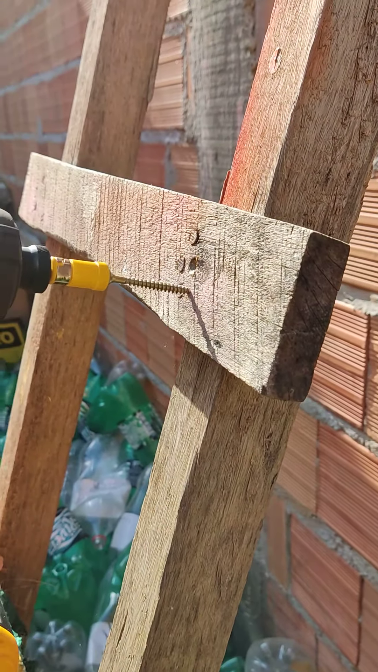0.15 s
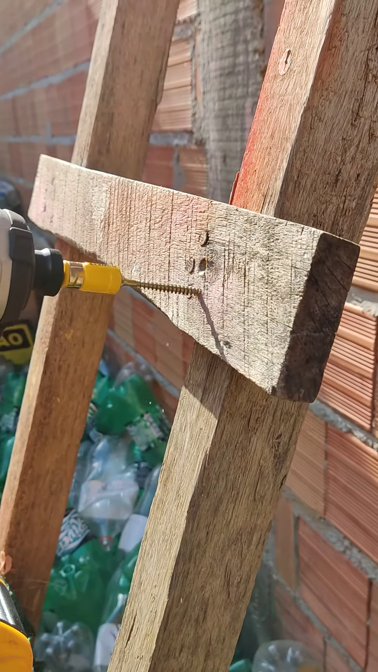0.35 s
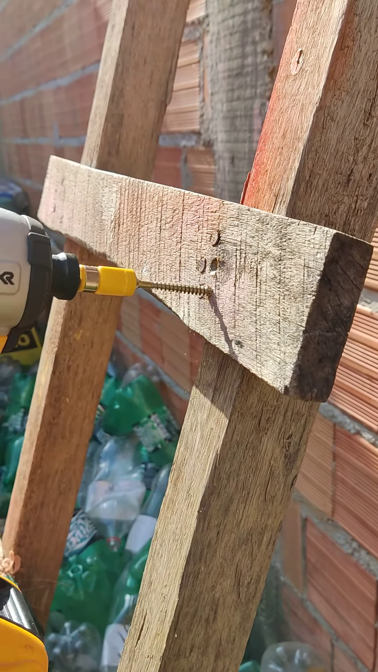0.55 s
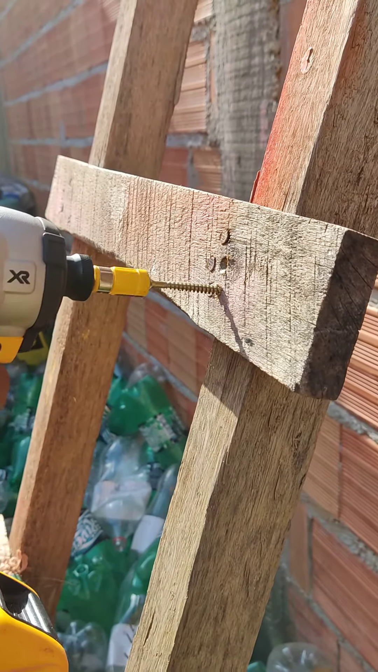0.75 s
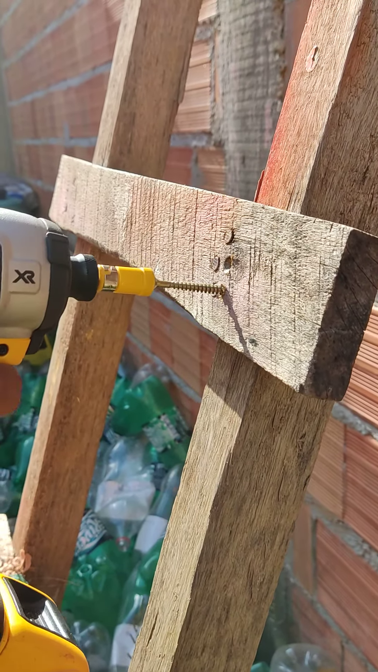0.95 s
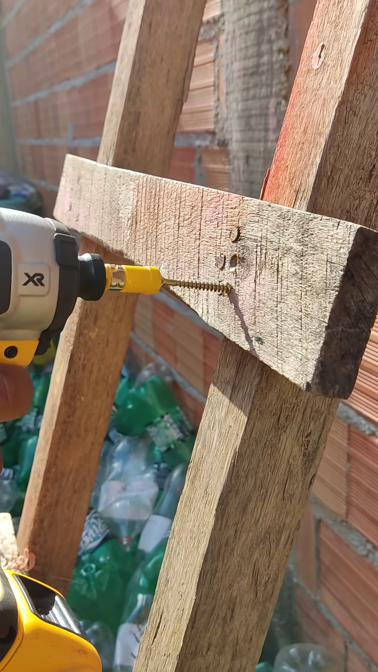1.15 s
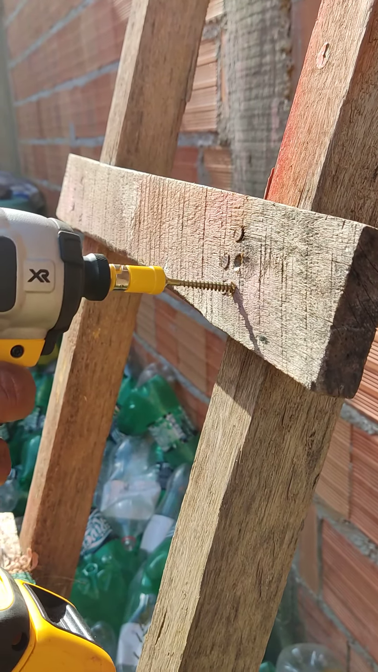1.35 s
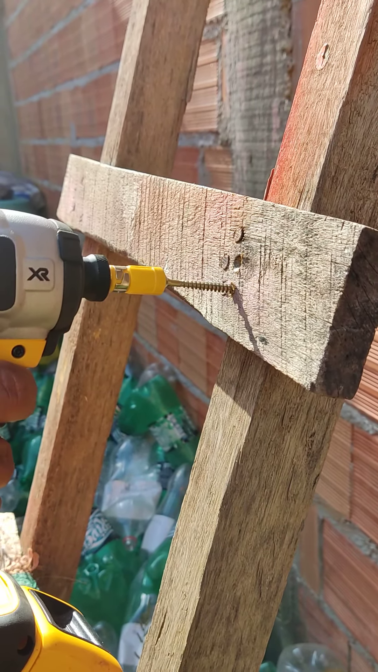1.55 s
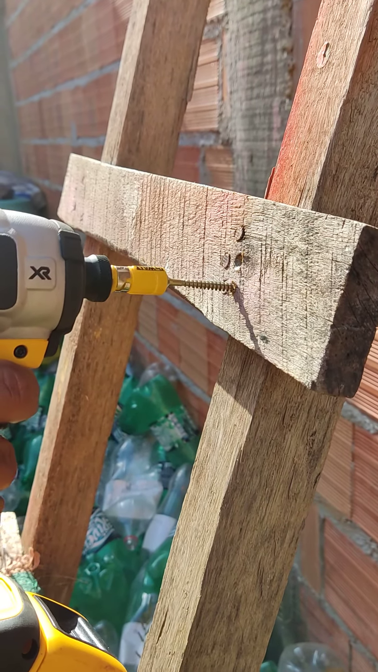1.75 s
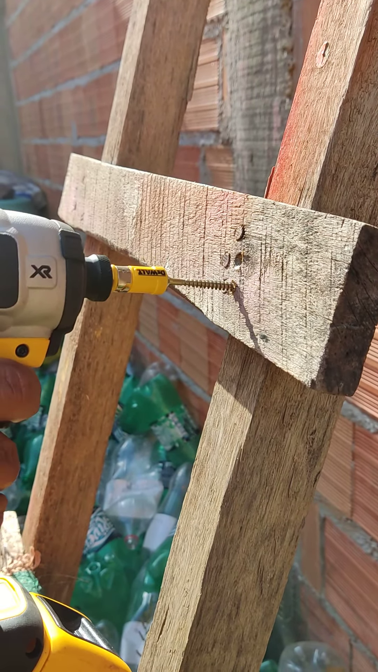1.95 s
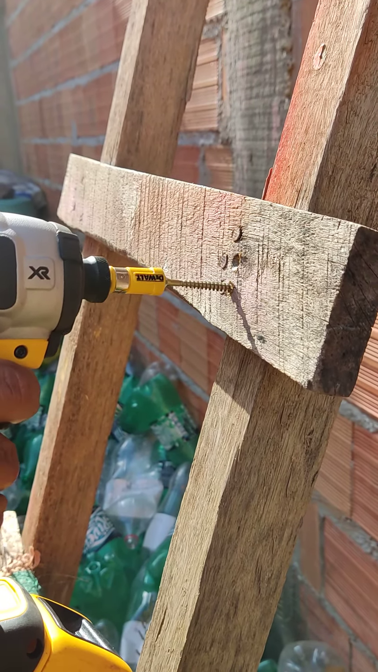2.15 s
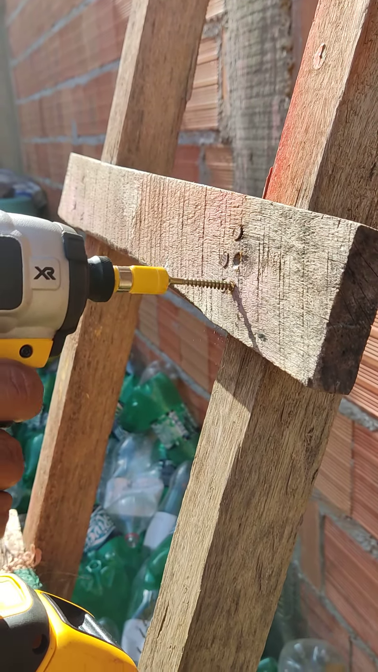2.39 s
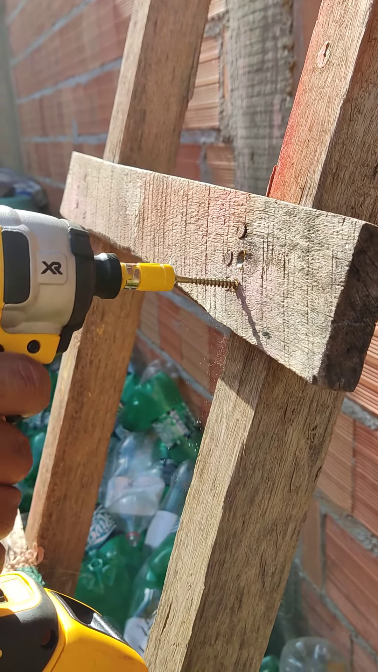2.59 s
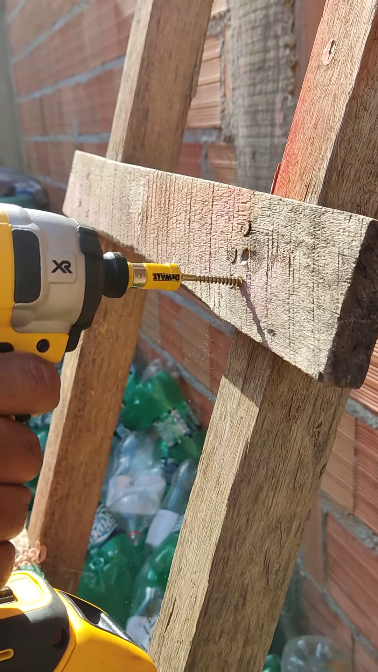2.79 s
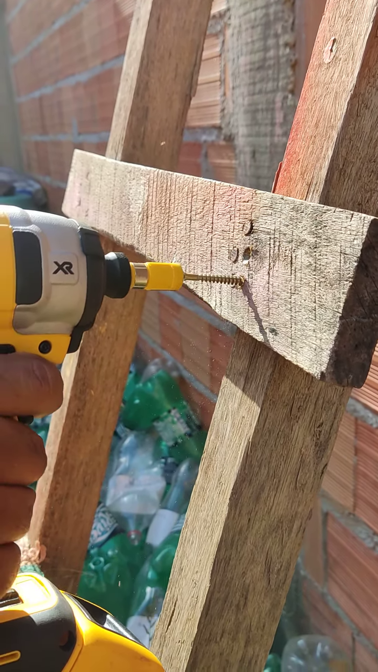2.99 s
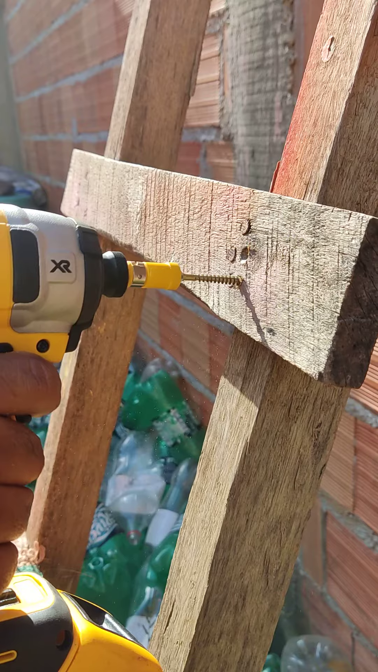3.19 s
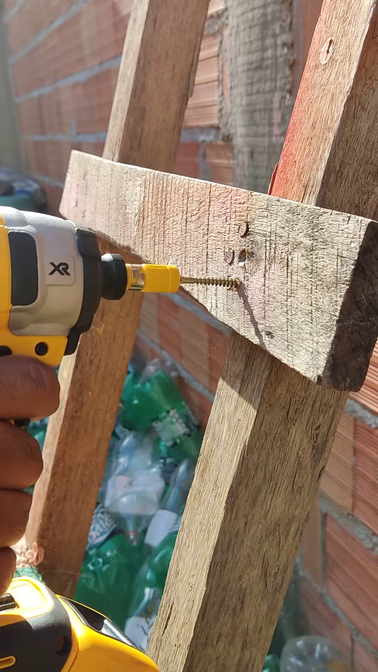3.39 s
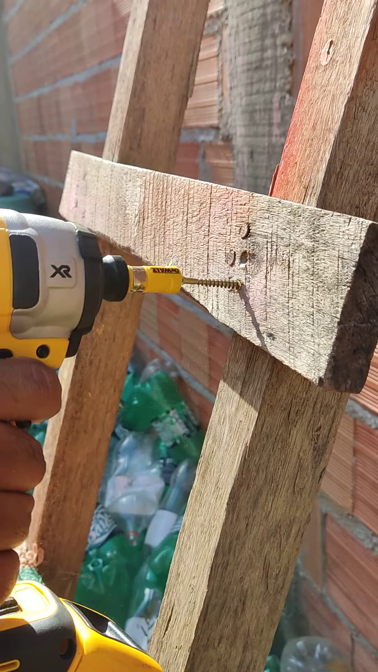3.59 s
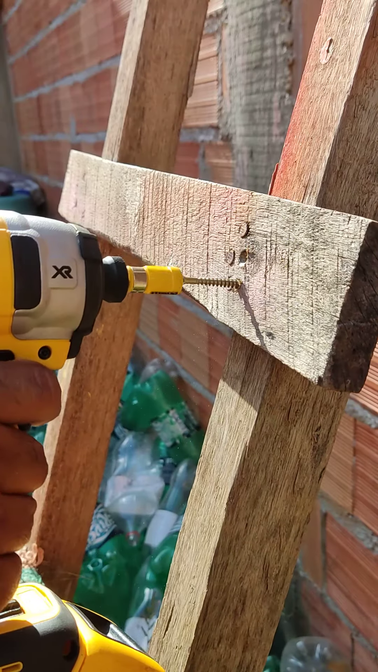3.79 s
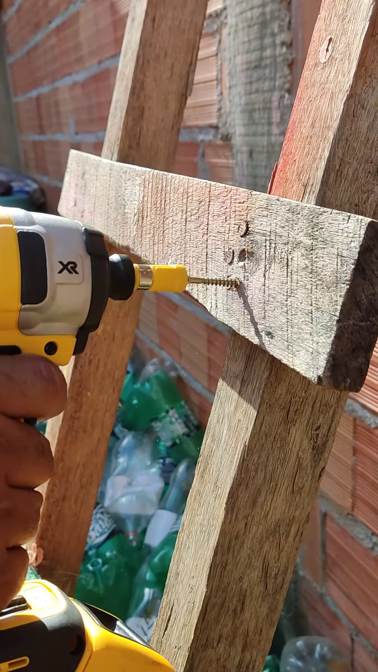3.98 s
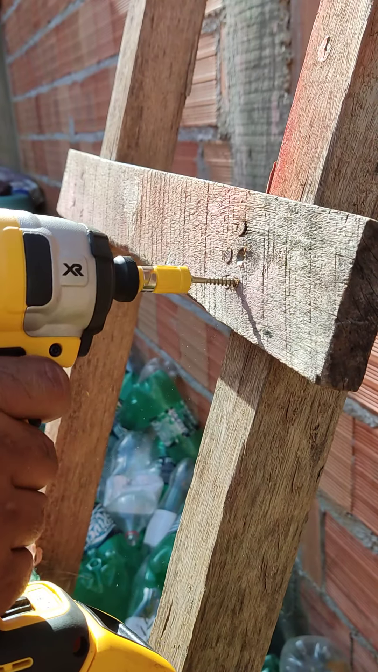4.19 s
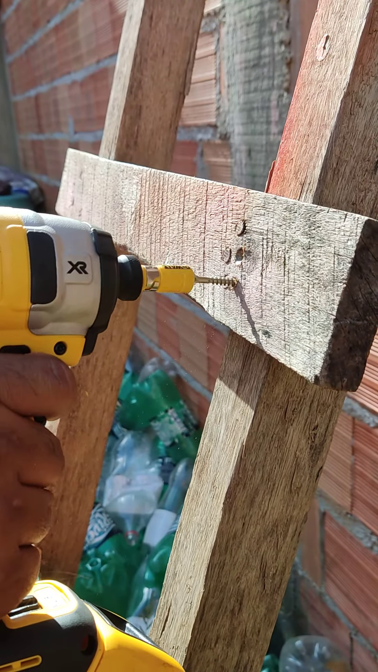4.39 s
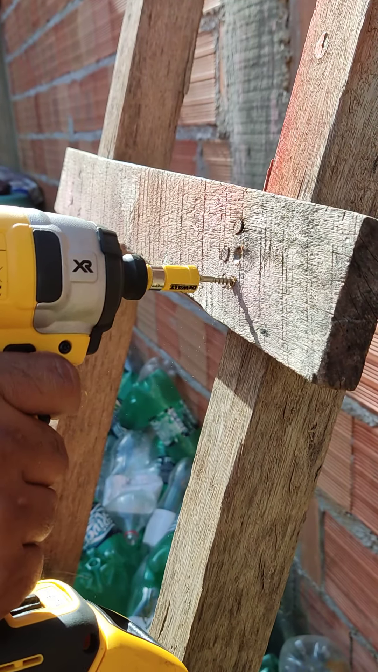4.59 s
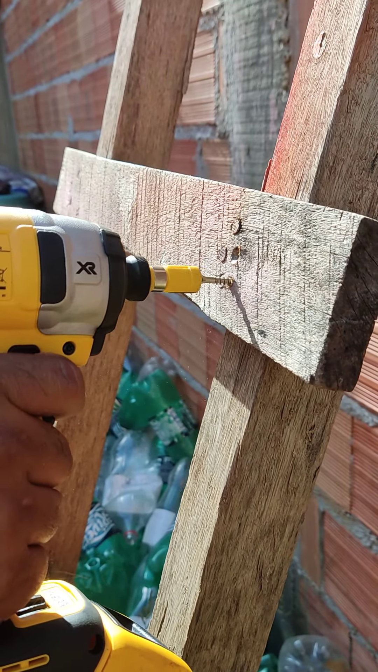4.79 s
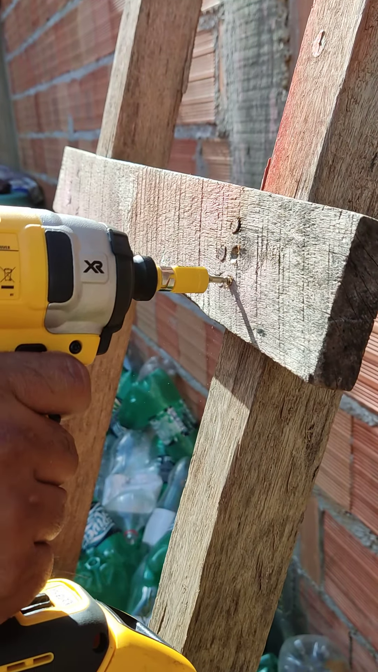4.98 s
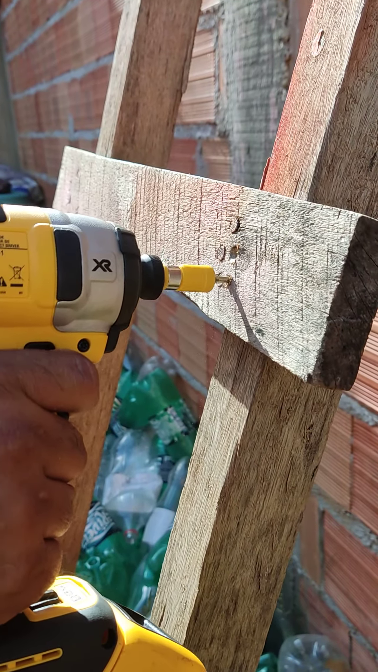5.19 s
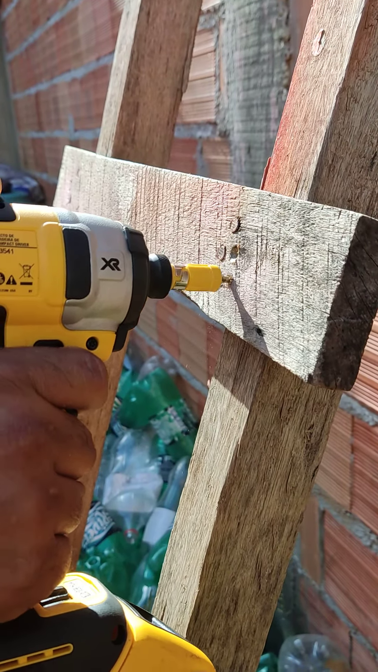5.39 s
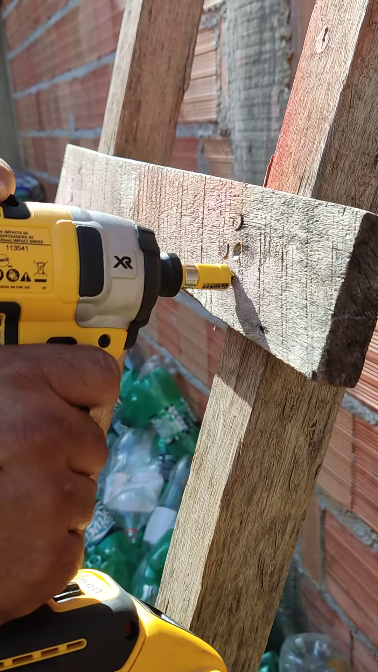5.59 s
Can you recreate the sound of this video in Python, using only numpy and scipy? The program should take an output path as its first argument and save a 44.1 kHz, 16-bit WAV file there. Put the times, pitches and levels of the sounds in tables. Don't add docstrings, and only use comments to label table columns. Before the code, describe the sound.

Outdoors by a brick wall, very close to a stereo microphone, an impact driver whines briefly and coasts to silence. Gear teeth tick slowly and unevenly, then its hammer bangs about twenty-three times a second, driving a screw into dry wood. At full trigger the blows double in speed and blur into a harsh rattle, overloading the right side. A distant machine hums faintly.

```python
import sys
import numpy as np
from scipy import signal
from scipy.fft import rfft, irfft, next_fast_len
from scipy.io import wavfile
from scipy.ndimage import uniform_filter1d, map_coordinates

SR = 44100
rng = np.random.default_rng(int(sys.argv[2]) if len(sys.argv) > 2 else 0)


def waveform_to_disk(signal):
    frames = np.transpose(np.atleast_2d(signal))
    scaled = np.clip(frames, -1, 1) * 32767
    samples = np.round(scaled).astype(np.int16)
    wavfile.write(sys.argv[1], SR, samples)


def makeup_ratio(level_db):
    decades = np.asarray(level_db, float) / 20
    return 10 ** decades


N = 248988
TIME = np.arange(N) / SR
FULL_S = 3.82

# (frequency [Hz], level [dB])
CLICK = [(400, -5.5), (1000, -4), (1950, -6), (2440, 7), (3000, 3), (4000, -4.5), (7000, -12.5),
         (9200, -6.5), (12000, -21.5), (15000, -20)]


def along(points, hz):
    f, v = np.transpose(points)
    return np.interp(np.log(hz + 1), np.log(f + 1), v)


def curves(rows):
    s, *cols = np.transpose(rows)
    already_open = 0.036 * (s[0] == 0)
    since_start = TIME - s[0] + already_open
    until_end = s[-1] + 0.024 - TIME
    gate = np.clip(np.minimum(since_start, until_end) / 0.027, 0, 1)
    return [np.interp(TIME, s, c) for c in cols] + [gate]


def wobble(rate):
    return map_coordinates(rng.standard_normal(int(N * rate / SR) + 4), [TIME * rate])


def unsteady_tone(hz, drift_hz, rate):
    return np.sin(2 * np.pi * np.cumsum(hz + drift_hz * wobble(rate)) / SR)


def filtered(x, response):
    m = next_fast_len(N + 8192)
    return irfft(rfft(x, m) * response(np.fft.rfftfreq(m, 1 / SR)), m)[..., :N]


def heard(envelope, spectrum):
    # (frequency [Hz], likeness [0 to 1])
    alike = [(100, 0.88), (700, 0.46), (1900, 0.53), (3000, 0.47), (4500, 0.068), (7000, 0.31),
             (10000, 0.028)]

    def shape(hz):
        turn = np.arccos(np.clip(along(alike, hz), 0, 1)) / 2
        return makeup_ratio(along(spectrum, hz)) * [np.cos(turn), np.sin(turn)]

    scale = np.sqrt(np.mean(makeup_ratio(along(spectrum, np.linspace(0, SR / 2, num=500))) ** 2))
    mid, side = filtered(envelope * rng.standard_normal((2, N)), shape) / scale
    return np.array([mid + side, mid - side])


def bursts(s, db, t60, rise):
    power = np.zeros(N + SR)
    t = np.arange(-SR // 100, SR // 16) / SR
    for start, level, life, swell in np.broadcast(s, db, t60, rise):
        puff_db = level - 60 * np.maximum(t / life, -t / swell)
        power[round(start * SR) - SR // 100:][:len(t)] += makeup_ratio(2 * puff_db)
    return np.sqrt(power[:N])


def rings(s, db, modes, scatter_db, rise):
    out = np.zeros((2, N + SR))
    t = np.arange(SR // 20) / SR
    hz, level, t60 = np.transpose(modes)[:, :, None]
    soft_start = 1 - np.exp(-(t / rise) ** 2)
    shapes = makeup_ratio(level - 60 * t / t60) * np.sin(2 * np.pi * hz * t) * soft_start
    shared = rng.standard_normal((len(s), 1, len(modes)))
    own = rng.standard_normal((len(s), 2, len(modes)))
    strokes = makeup_ratio(db[:, None, None] + scatter_db * (shared + .5 * own)) @ shapes
    for start, stroke in zip(s, strokes):
        out[:, round(start * SR):][:, :len(t)] += stroke
    return out[:, :N]


def yard():
    # (frequency [Hz], level [dB])
    tones = [(242.2, -57), (635, -65.5)]
    # (frequency [Hz], level [dB])
    floor = [(25, -2.5), (80, -5), (150, -9), (200, -11), (330, -7.5), (450, -17), (700, -12),
             (1200, -22.5), (3000, -24.5), (9000, -36.5), (15000, -41)]
    hum = sum(makeup_ratio(db + 4 + 2.5 * wobble(18)) * unsteady_tone(hz, 5, 20) for hz, db in tones)
    swell_db = 1.8 * wobble(2.3)
    return hum + heard(makeup_ratio(-50 + swell_db), floor)


def free_running():
    # (time [s], whine level [dB], shaft tones over the whine [dB])
    rev = [
        (0, -31.5, -14),
        (.29, -31, -13),
        (.36, -20.5, -14.5),
        (.44, -21.5, -14),
        (.52, -21, -12.5),
        (.65, -22.5, -12.5),
        (.925, -28.5, -11),
        (.955, -51, -4),
        (1.01, -67, 3),
    ]
    # (time [s], turns a second [Hz])
    speed = [(0, 199), (.076, 214), (.12, 204), (.164, 212), (.268, 185), (.298, 271), (.354, 443),
             (.372, 453), (.472, 437), (.612, 334), (.648, 299), (.684, 285), (.754, 239), (.792, 229),
             (.894, 179), (1, 165)]
    # (frequency [Hz], level [dB])
    housing = [(150, -18), (400, -5), (640, 2), (850, 1), (1000, -2), (1170, 5), (1420, -4), (1700, 7),
               (2000, -5), (2300, 9), (2900, 6), (3550, 10), (4400, -1), (5000, 3), (5900, 2), (9000, -6)]
    # (frequency [Hz], level [dB])
    whine = [(150, -25), (400, -16), (1000, -13.5), (1450, -3), (1700, -5.5), (2000, -6.5), (2440, -11),
             (2900, -0.5), (3550, 3.5), (4400, -7), (5900, -2), (7000, -1.5), (9000, -9), (12000, -14),
             (15000, -20)]
    # (time [s], extra level [dB])
    surges = [(.375, 2.5), (.5, 2.7), (.548, 2.5), (.645, 2.5), (.735, 2.5), (.86, 2.2)]

    end = SR + SR // 20
    whine_db, tone_db, gate = curves(rev)
    hz = curves(speed)[0] * (1 + .007 * wobble(45) + .009 * wobble(200))
    turn = 2 * np.pi * np.cumsum(hz) / SR

    order = np.arange(1, 30, .5)[:, None]
    half_order_db = -11 * (order % 1 > 0)
    knots = rng.standard_normal((len(order), 40))
    flicker = np.array([np.interp(TIME[:end], np.linspace(0, 1.05, num=40), k) for k in knots])
    phase = order * turn[:end] + rng.uniform(0, 2 * np.pi, order.shape)
    order_db = along(housing, order * hz[:end]) + half_order_db + 3.8 * flicker
    tones = np.pad(np.sum(makeup_ratio(order_db) * np.sin(phase), axis=0), (0, N - end))

    surge_db = sum(db * np.exp(-((TIME - s) / 0.021) ** 2) for s, db in surges)
    rattle_db = whine_db + surge_db - 5.5 + .8 * wobble(30) + 2.5 * wobble(300)
    rattle = makeup_ratio(rattle_db) * (1 + .55 * np.cos(turn))
    free = gate * makeup_ratio(whine_db + tone_db - 9.0) * tones + heard(gate * rattle, whine)
    return free * makeup_ratio([[-1.8], [1.8]])


def teeth():
    # (time [s], ring level [dB])
    ticks = [(0.926, -25), (0.944, -29), (.958, -40), (.971, -38), (0.984, -41.5), (1.2983, -43),
             (1.3095, -41), (1.3155, -44), (1.335, -34.5), (1.3461, -27.5), (1.349, -34), (1.3771, -45),
             (1.407, -27), (1.4355, -27), (1.473, -31.5), (1.516, -29), (1.553, -27.5), (1.568, -32),
             (1.587, -31), (1.605, -27), (1.6242, -30), (1.644, -29), (1.665, -28.5), (1.6867, -32),
             (1.71, -29.5), (1.7352, -29.5), (1.765, -30), (1.797, -30), (1.827, -27.5), (1.862, -29),
             (1.9, -29), (1.9394, -27), (1.993, -28.5), (2.055, -30), (2.116, -28.5), (2.1867, -28),
             (2.268, -28.5), (2.296, -25), (2.321, -25), (2.3442, -16)]
    s, db = np.transpose(ticks)
    gap = np.diff(s)
    too_short_db = -60 * (gap < .037)
    slack_db = db[:-1] - 13 + too_short_db + 3 * rng.standard_normal(len(gap))
    s = np.append(s, s[:-1] + .57 * gap)
    db = np.append(db, slack_db)
    click_db = -26.5 + (db + 29.5) - db
    return s, db, click_db


def gears():
    # (time [s], level [dB])
    snicks = [(1.301, -14), (1.323, -16), (1.338, -8.5), (1.347, -22), (1.4172, -14), (1.4864, -47),
              (1.493, -13), (1.5334, -31), (1.55, -22), (1.5574, -22), (1.5739, -22), (1.587, -18),
              (1.6565, -24), (1.699, -25), (1.7105, -38), (1.7494, -28), (1.7794, -35), (2.176, -21),
              (2.3052, -6), (2.314, -4), (2.3321, -1)]
    # (frequency [Hz], level [dB])
    plastic = [(300, -9), (1200, -7), (3500, -0.5), (5500, -11), (12000, -20)]
    # (frequency [Hz], level [dB], time to fall 60 dB [s])
    case_modes = [(2440, 4, .027), (2560, -4, .018), (2250, -5, .012), (2800, -6, .012)]

    s, ring_db, click_db = teeth()
    case = rings(s - .001, ring_db, case_modes, scatter_db=1, rise=.0012)
    clicks = bursts(s + 0.00034, ring_db + click_db - 7.0, t60=0.015, rise=0.0092)
    lone_s, lone_db = np.transpose(snicks)
    clicks = clicks + bursts(lone_s + 0.00087, lone_db - 21.0, t60=0.0066, rise=0.0018)
    scrape_s = [1.083, 1.0875, 1.092, 1.098, 1.107]
    scrape = bursts(scrape_s, [-45, -35, -36.5, -32.5, -46], t60=0.022, rise=0.0061)
    return case * makeup_ratio([[-2.5], [2.5]]) + heard(clicks, CLICK) + heard(scrape, plastic)


def working_motor():
    # (time [s], gear hiss [dB], rumble over the hiss [dB])
    creep = [
        (1.26, -90, -8),
        (1.3, -48, -15),
        (1.37, -56, 4),
        (1.5, -54, -3),
        (1.57, -40.5, -12),
        (1.68, -43, -11),
        (1.77, -48.5, -8),
        (2, -55.5, 1.5),
        (2.3, -57, -3),
    ]
    # (time [s], whine level [dB], beam rumble [dB])
    load = [
        (2.27, -51, -73),
        (2.3, -42, -31.5),
        (2.345, -31, -39),
        (2.4, -17.5, -28),
        (2.6, -24.5, -30.5),
        (3.7, -28, -31.5),
        (3.87, -13, -27.5),
        (3.95, -17, -42),
        (5.65, -15.5, -31),
    ]
    # (frequency [Hz], level [dB])
    steel = [(150, -8.5), (400, -15.5), (1000, -7.5), (1700, 0.5), (2500, 5), (3400, 7), (4300, 2),
             (6000, 1), (9000, -1.5), (12000, -4), (15000, -1.5)]
    # (frequency [Hz], level [dB])
    low_noise = [(30, -22), (120, 14), (300, 6), (800, 10.5), (1200, 9), (1600, 13.5), (2500, -34)]

    creep_db, low_db, creeping = curves(creep)
    load_db, rumble_db, loaded = curves(load)
    hiss_db = creep_db - 5.5 + 3.5 * wobble(60) + 3 * wobble(300)
    hiss = heard(creeping * makeup_ratio(hiss_db), CLICK) * makeup_ratio([[-1.8], [1.8]])
    whine_db = load_db - 5 + 2.24 * wobble(45) + 2.4 * wobble(120) + 0.21 * wobble(500)
    whine = heard(loaded * makeup_ratio(whine_db), steel)
    rumble = loaded * makeup_ratio(rumble_db - 7.0) + creeping * makeup_ratio(creep_db + low_db + 0.5)
    return hiss + whine + heard(rumble, low_noise)


def windings():
    # (frequency [Hz], level [dB])
    tones = [(985, -62), (1480, -62)]
    gate = np.clip(np.minimum(TIME - 1.97, 2.28 - TIME) / .03, 0, 1)
    return gate * sum(makeup_ratio(db + 2 * wobble(25)) * unsteady_tone(hz, 6, 30) for hz, db in tones)


def blows():
    # (time [s], blow level [dB], rebound over it [dB], cam tick [dB])
    slow_blows = [(2.3452, -11.5, 1, -40), (2.363, -4.5, -6, -26), (2.3816, -3.5, -5, -9),
                  (2.4204, -9, 5.5, -24), (2.461, -4.5, -5, -5), (2.4937, -6, -1.5, -13),
                  (2.535, -4, -5, -4.5), (2.58, -5, -6, -28), (2.6244, -4.5, -7, -16),
                  (2.668, -6.5, -1, -12), (2.7131, -6.5, -7, -21), (2.7571, -7.5, -1.5, -4),
                  (2.8014, -6.5, -4.5, -23), (2.8457, -6, -2, -14), (2.8896, -3.5, -6.5, -23),
                  (2.9367, -6, -3.5, -7), (2.986, -5.5, -0.5, -10), (3.0293, -5, -4, -24),
                  (3.0717, -6, -3.5, -11), (3.1147, -5.5, -6, -26), (3.157, -6, -3, -7.5),
                  (3.1993, -4.5, -5.5, -12), (3.2425, -4.5, -5, -9), (3.283, -6, -2.5, -19),
                  (3.3255, -7, 0, -12), (3.3674, -7, 0, -25), (3.4092, -5.5, -3.5, -21),
                  (3.451, -6.5, 1, -9), (3.4921, -4, -9, -23), (3.5327, -6.5, -3, -8),
                  (3.5746, -4.5, -2, -23), (3.6161, -5.5, -4, -9), (3.6574, -6.5, -5.5, -8),
                  (3.699, -4.5, -6, -4.5), (3.7399, -4, -7, -29), (3.7796, -3, -10, -18),
                  (3.807, -4.5, -1, -16)]
    # (time [s], blow level [dB], rebound over it [dB])
    fast_blows = [(3.834, -6, 1), (3.8571, -6, -1), (3.879, -2.5, -9), (3.898, -8, 4.5), (3.92, -9, -2),
                  (3.9403, -6, 0), (3.963, -6.5, -1), (3.987, -8, -6), (4.0042, -7, 0), (4.0249, -6.5, -7),
                  (4.046, -9, 2), (4.067, -6, -2), (4.0897, -7, -1), (4.109, -10, -1), (4.129, -5, -11),
                  (4.15, -5, -4), (4.1706, -7, -5), (4.191, -7.5, -3), (4.212, -10, 0), (4.2329, -8.5, 2),
                  (4.2538, -4.5, -4), (4.2736, -6.5, -5), (4.294, -5, -5), (4.3142, -9, -11),
                  (4.334, -5.5, -6), (4.355, -6.5, -16), (4.376, -5, -12), (4.3973, -8.5, 1),
                  (4.417, -12, 3), (4.438, -5.5, -4), (4.4592, -6, -6), (4.479, -6.5, -1), (4.499, -10, 0),
                  (4.5202, -7, -5), (4.5397, -6, -3), (4.5608, -7.5, -1), (4.5812, -7, -1),
                  (4.6024, -7, -17), (4.6233, -7, -9), (4.6434, -6, -2), (4.6643, -5.5, -6),
                  (4.6853, -4.5, -10), (4.7058, -5.5, -2)]
    # (time [s], blow level [dB], rebound over it [dB])
    later_fast_blows = [(4.7271, -7, -10), (4.7468, -4, -13), (4.7681, -3, -8), (4.789, -5, -10),
                        (4.8103, -10.5, -7), (4.8315, -5.5, -4), (4.852, -4, -4), (4.8724, -9.5, 0),
                        (4.894, -7, -3), (4.9145, -7, -2), (4.9367, -6.5, -4), (4.9583, -9, 1), (4.979, -10, 0),
                        (5.001, -6.5, -7.5), (5.0225, -5, -3), (5.0451, -6.5, -5), (5.0661, -7.5, -0.5),
                        (5.088, -7.5, -12), (5.11, -6, -6), (5.1313, -9.5, -0.5), (5.1527, -8, -3),
                        (5.1753, -10, -1), (5.1982, -9.5, -10), (5.2192, -8.5, -2), (5.2415, -4, -8),
                        (5.2635, -5.5, -7), (5.2853, -6.5, -8), (5.3074, -7.5, -1.5), (5.329, -10, -1),
                        (5.3489, -9.5, 7), (5.3715, -10, 5), (5.393, -6.5, 1), (5.415, -8.5, -1),
                        (5.4353, -8, -2), (5.4573, -4.5, -7), (5.478, -7, -1), (5.5, -5, -2), (5.5215, -6.5, 1),
                        (5.5421, -8.5, 0), (5.564, -7, -10), (5.584, -3.5, -8), (5.607, -6.5, -4),
                        (5.6274, -8.5, 3.5)]
    # (time [s], size [full scale])
    jolts = [(2.382, -.07), (2.713, -.08), (2.987, -.06), (3.072, -.07), (3.451, -.05), (3.617, -.05),
             (3.739, -.07), (3.88, -.15), (4.005, -.11), (4.067, .11), (4.13, -.11), (4.275, -.08),
             (4.295, .11), (4.336, -.09), (4.377, .1), (4.398, -.1), (4.418, .38), (4.439, -.18),
             (4.479, -.12), (4.541, -.15), (4.603, .09), (4.623, -.11), (4.644, .1), (4.894, .17),
             (5.11, -.13), (5.308, -.15), (5.33, .2), (5.393, -.08), (5.586, .11), (5.627, -.1)]

    s, db, rebound_db = np.transpose([row[:3] for row in slow_blows + fast_blows + later_fast_blows])
    beat = np.where((s > 3.9) & (s < 5.6), uniform_filter1d(s, size=5), s)
    slip_s = .0008
    s = beat + np.clip(s - beat, -slip_s, slip_s)
    jump = np.where(s < FULL_S, .012, .025) * rng.standard_normal(len(s))
    jolt_s, size = np.transpose(jolts)
    jump[np.abs(s[:, None] - jolt_s).argmin(axis=0)] = size
    cam_db = -27.5 + 1.25 * (np.transpose(slow_blows)[3] + 18)
    return s, beat, db - 4, rebound_db - 1.57, jump, cam_db


def hammer(s, db, rebound_db, cam_db):
    # (delay [s], level [dB], time to fall 60 dB [s])
    rebounds = [
        (0, -1, 0.021),
        (.0048, -2.5, 0.034),
        (.0098, -26.5, .03),
    ]
    # (frequency [Hz], level [dB], time to fall 60 dB [s])
    loose_beam = [(350, -3, .05), (740, -3, .035), (810, -4, .04), (1000, -6, .03), (1155, 3, .065),
                  (1280, -3, .05), (1560, -4, .04), (2200, 2, .035), (2410, -1, .025), (3190, -5, .018),
                  (3960, -2, .02), (4750, 0, .012)]
    # (frequency [Hz], level [dB], time to fall 60 dB [s])
    tight_beam = [(330, -2, .05), (805, -4, .045), (960, -8, .03), (1095, 0, .055), (1160, -1, .055),
                  (1290, -1, .05), (1340, -4, .04), (1680, -3, .04), (2180, 0, .035), (2480, -2, .015),
                  (3190, 4, .035), (3650, -2, .035), (3970, -1, .02), (4750, 1, .012)]
    # (frequency [Hz], level [dB])
    bright = [(2500, -43), (5000, -1.5), (7000, -0.5), (9000, -0.5), (12000, -2.5), (15000, -7)]
    # (frequency [Hz], level [dB])
    dull = [(150, -8), (400, -18), (1000, 0.5), (1700, -3.5), (2600, -2), (3400, 2.5), (4300, 1.5),
            (5000, 1.5), (7000, -45), (10000, -45)]

    luck = rng.standard_normal((len(s), len(rebounds), 3))
    slow = s < FULL_S
    snap_lag, snap_rise = np.where(slow, .0012, .0018), np.where(slow, .0055, .008)
    snap, thud, knock = 0, 0, 0
    for k, (delay, less_db, t60) in enumerate(rebounds):
        start = s + delay + .0004 * luck[:, k, 0] * (k > 0)
        level = db + less_db + rebound_db * (k > 0) + 3 * luck[:, k, 1] * (k > 1)
        colour_db = 1.5 * luck[:, k, 2]
        snap = snap + bursts(start + snap_lag, level - 2.5 + colour_db, t60, snap_rise) ** 2
        thud = thud + bursts(start + 0.0013, level - 6.5 - colour_db, 1.15 * t60, rise=0.0075) ** 2
        late_db = 7 * (k > 1)
        for part, modes, more_db in ((slow, loose_beam, 2.5), (~slow, tight_beam, 1.2)):
            knock_s = s[part] + 1.083 * delay
            knock_db = -27.5 + .5 * level[part] + more_db + late_db
            knock = knock + rings(knock_s, knock_db, modes, scatter_db=1.3, rise=0.0013)

    tick = bursts(s[slow] - .0092, cam_db, t60=.008, rise=.004)
    ramp = bursts(s[slow] - .0042, .5 * cam_db - 21.0, t60=0.017, rise=0.0047)
    cam = np.hypot(tick, ramp)
    grit = makeup_ratio(0.68 * wobble(1400))
    snap = heard(np.sqrt(snap + cam ** 2) * grit, bright)
    thud = heard(np.sqrt(thud + (.25 * cam) ** 2) * grit, dull)
    return snap + thud + knock


def overload(s, jump):
    thumps = [4.066, 4.15, 4.19, 4.355, 4.705, 4.768, 5.33]
    spike = np.where(s < FULL_S, .085, .115) * makeup_ratio(2 * rng.standard_normal(len(s)))
    spike[np.abs(s[:, None] - thumps).argmin(axis=0)] *= makeup_ratio(6)
    out = np.zeros(N + SR)
    t = np.arange(-SR // 200, SR // 6) / SR
    step = np.exp(-t / .025) / (1 + np.exp(-t / .0004))
    blip = np.exp(-.5 * ((t + .0003) / .00045) ** 2)
    for start, a, b in zip(s, jump, spike):
        hard_enough = start > 2.37
        out[round(start * SR) - SR // 200:][:len(t)] += ((a - .045) * step + b * blip) * hard_enough
    out = out[:N] - uniform_filter1d(out[:N], size=SR // 4)
    return np.array([.1 * np.roll(out, shift=8), out])


def wall(x):
    t = np.arange(SR // 8) / SR
    tail = rng.standard_normal((2, len(t))) * makeup_ratio(-60 * t / 0.027) * (t > .003)
    return signal.fftconvolve(x, tail / np.linalg.norm(tail[0]), axes=1)[:, :N]


def inlets(x):
    # (frequency [Hz], width [Hz], boost [dB])
    ports = [
        (11500, 1280, 9),
        (9150, 955, 14),
    ]
    # (frequency [Hz], lead [rad])
    leads = [(100, 14), (400, 0.5), (700, 0.5), (1290, 2), (1720, 3.5), (2240, -1.5), (3010, -2.5),
             (4820, -5), (6460, -7), (8270, -11), (11000, -13), (15000, -16.5)]
    centre, width, db = np.transpose(ports)[:, :, None]

    def response(hz):
        damping = 1j * hz * width
        inlet = 1 + (makeup_ratio(db) - 1) * damping / (centre ** 2 - hz ** 2 + damping)
        spacing = np.exp(.5j * along(leads, hz) * np.array([[1], [-1]]))
        return inlet * spacing / (1 + (hz / 14500) ** 80)

    return filtered(x, response)


def scene():
    # (frequency [Hz], left over right [dB])
    lean = [(350, 0), (800, -4), (1000, -3.5), (1160, -1.5), (1400, -2), (2200, -2.5), (4000, 0.5)]
    s, beat, db, rebound_db, jump, cam_db = blows()
    struck = hammer(s, db, rebound_db, cam_db)
    struck = filtered(struck, lambda hz: makeup_ratio(along(lean, hz) * np.array([[.5], [-.5]])))
    tool = free_running() + gears() + working_motor() + windings() + struck
    bounce = np.roll(tool, shift=round(.00207 * SR), axis=1)
    tool = tool + [[-.22], [-.15]] * bounce
    air = tool + makeup_ratio(-15) * wall(tool) + yard()
    return inlets(air) + overload(beat, jump)


def top_cut(x):
    return signal.sosfilt(signal.butter(12, 15600, fs=SR, output="sos"), x)


def record(dry):
    mix = dry / (1 + np.abs(dry / 1.06) ** 6) ** (1 / 6)
    return top_cut(mix)


dry = scene()
out = record(dry)
waveform_to_disk(out)
```